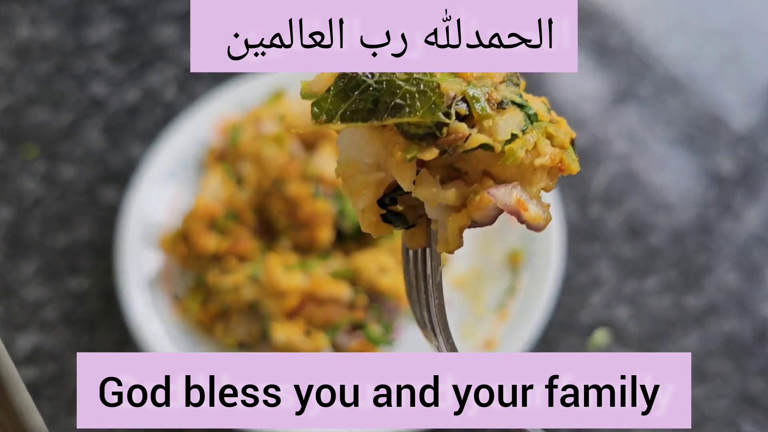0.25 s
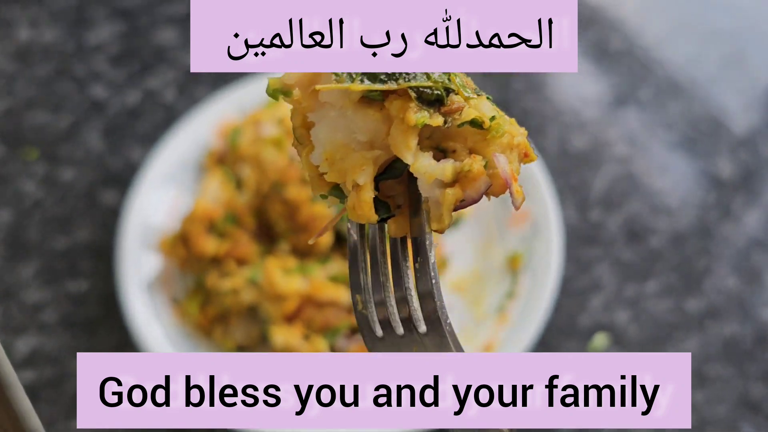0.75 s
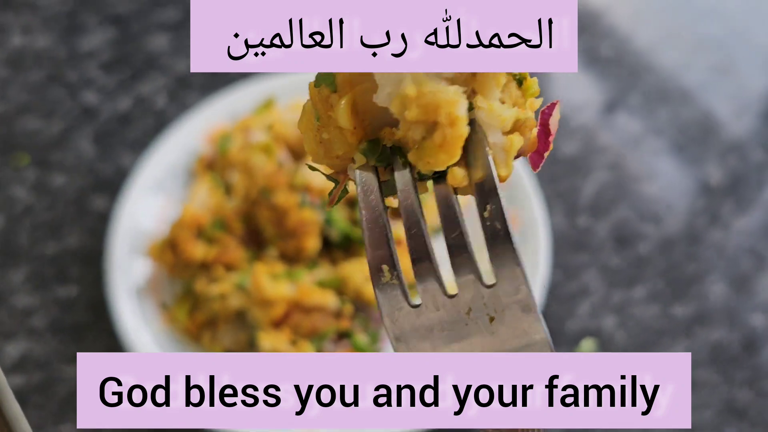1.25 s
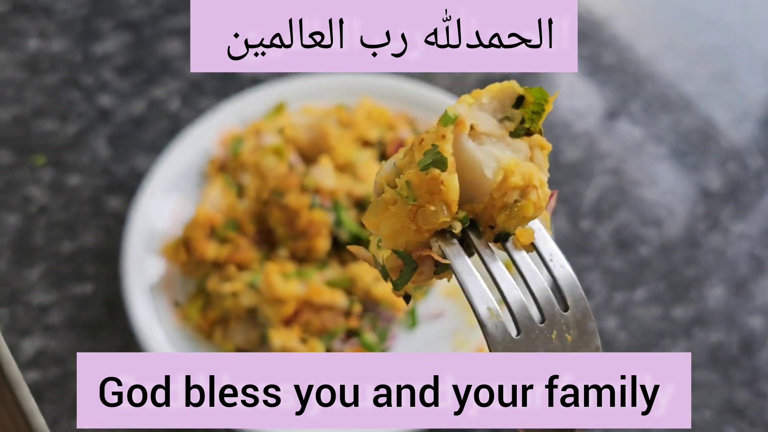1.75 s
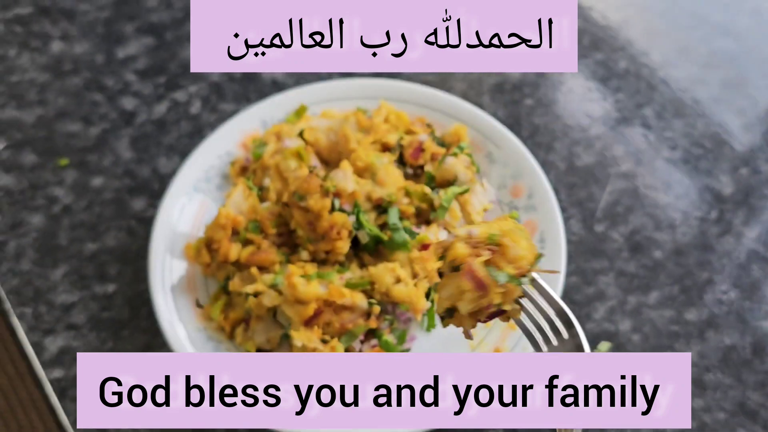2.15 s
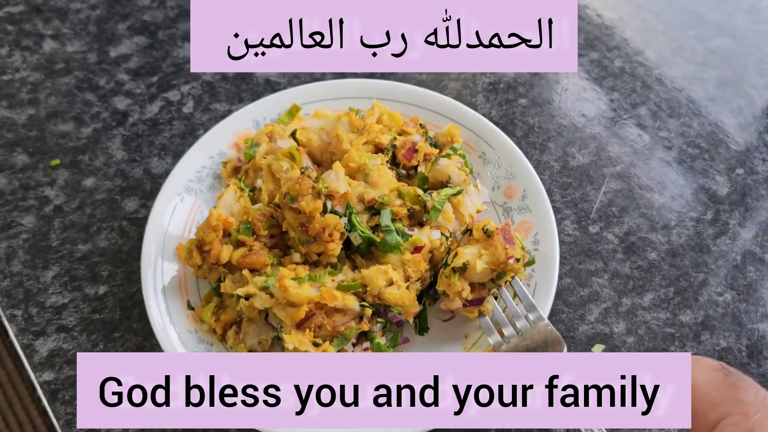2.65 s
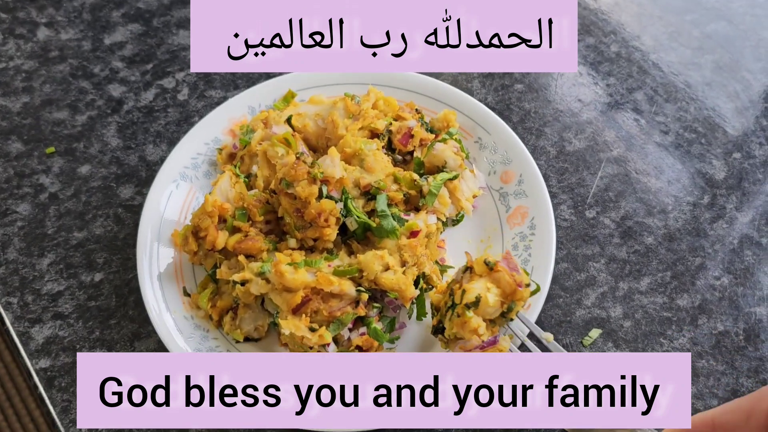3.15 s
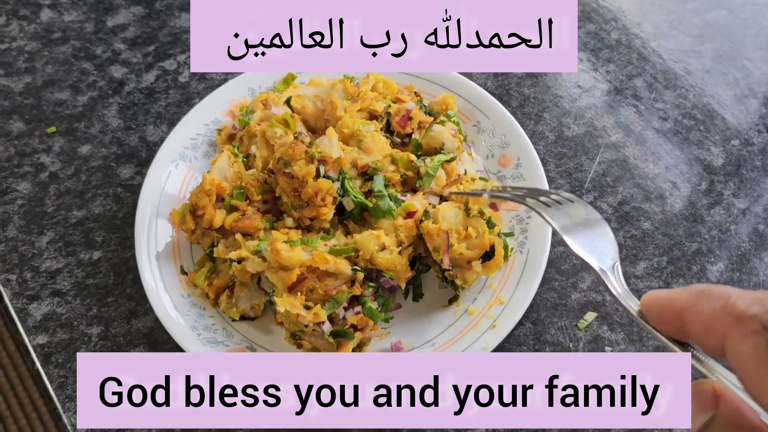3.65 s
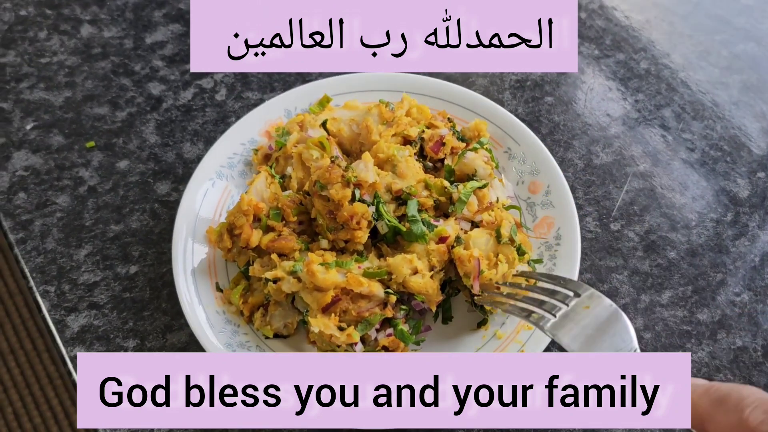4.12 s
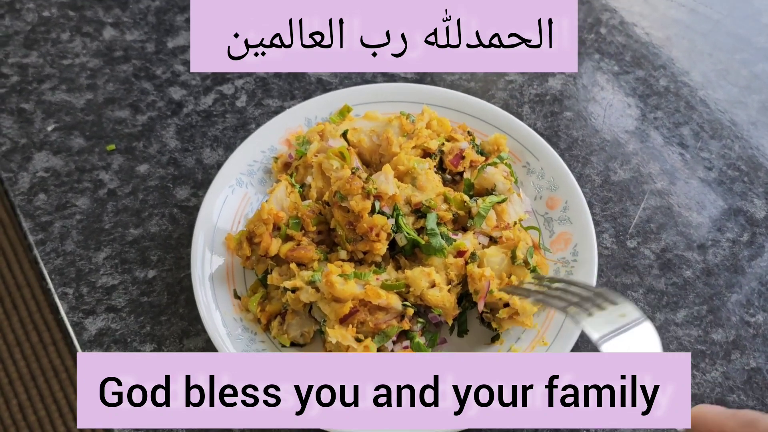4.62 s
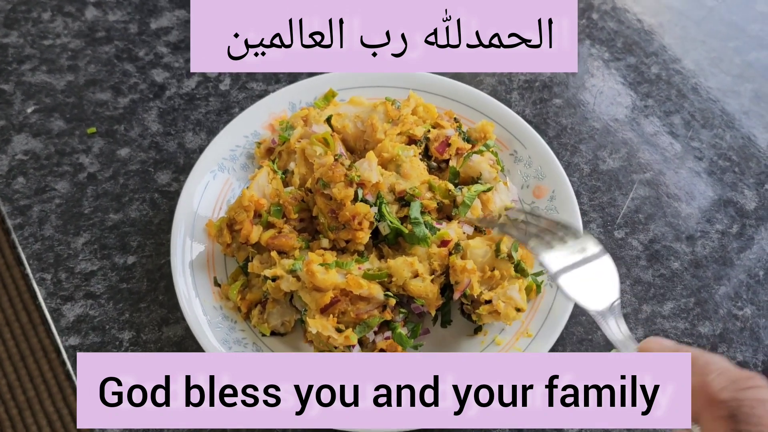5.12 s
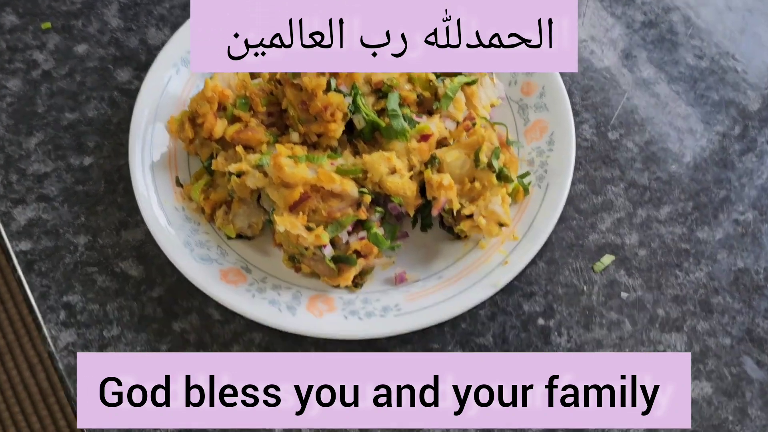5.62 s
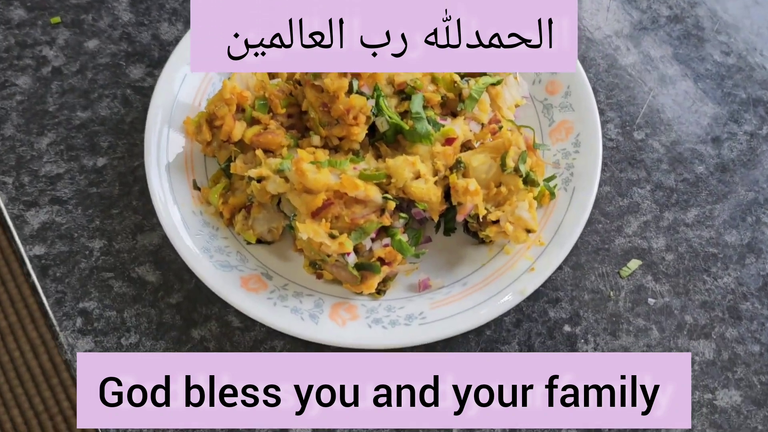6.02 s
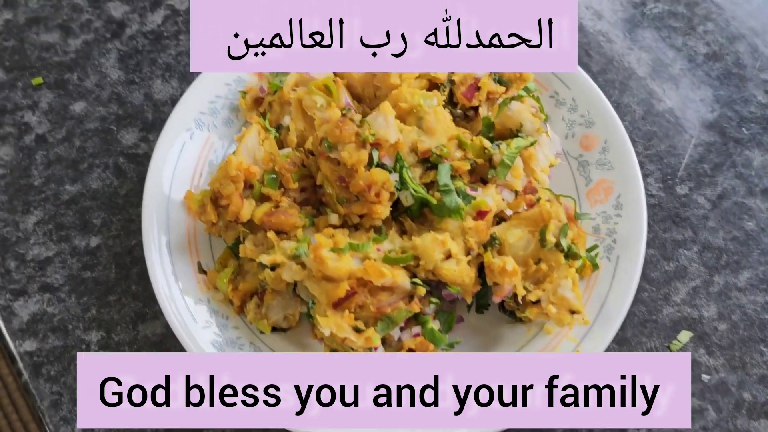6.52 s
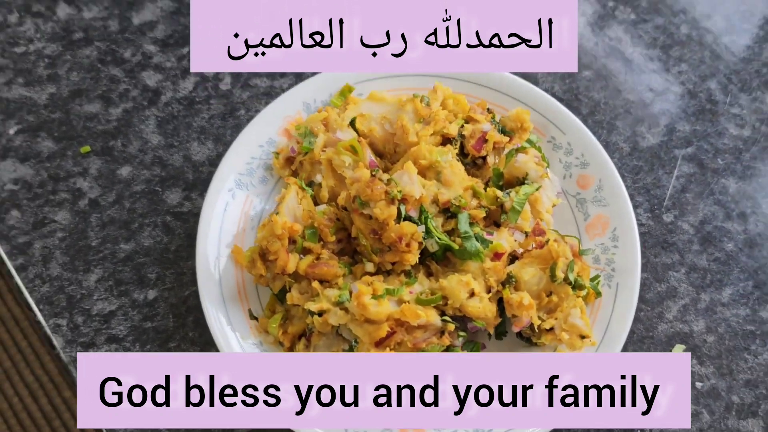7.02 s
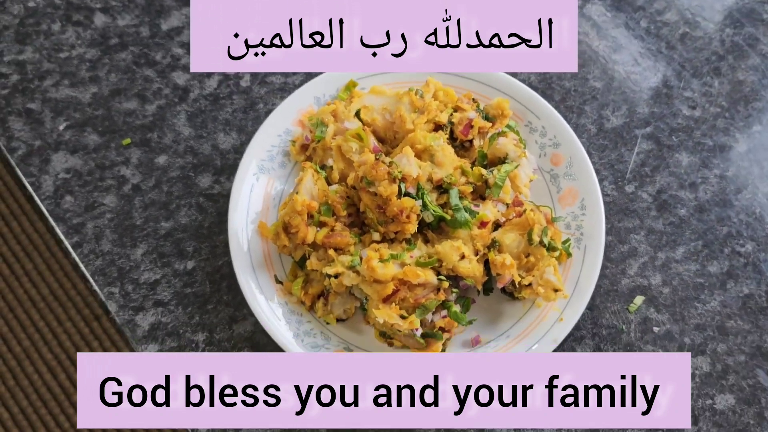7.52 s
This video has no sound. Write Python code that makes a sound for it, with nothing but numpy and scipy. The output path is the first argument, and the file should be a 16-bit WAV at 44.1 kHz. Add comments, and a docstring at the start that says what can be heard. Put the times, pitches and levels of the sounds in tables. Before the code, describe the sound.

A dull outdoor rumble with faint hiss, a very thin steady whine and a distant motor hum runs throughout, heard close by a handheld device in a small hard kitchen. From about 1.6 to 2.2 s a steel fork rubs a ceramic plate in short, food-dulled strokes, with deep handling bumps near 1.9. At 2.5 a bright clink rings with a soft food plop, and the motor begins spinning down. From 2.7 to 2.9 a drag swells quickly, singing, and stops with a small tick. Light scrapes, low bumps and soft plops continue to 4.3, then faint sticky ticks as the motor climbs back from 4.7. At 5.63 and 5.7 the plate knocks hard on stone. At 6.05 the fork lands with a brilliant metallic ring and rapid bounce. Short slides follow, the strongest scrape at 6.7; the hum grows louder around 6.8, with one last faint stroke at 7.1.

```python
"""Over a dull outdoor rumble, a thin whine and a far motor's hum, a steel fork rubs a ceramic plate in short strokes.
The hand bumps the phone, food plops, the fork clinks on the plate, the motor spins down and a swelling drag sings.
Faint sticky ticks come and the motor climbs back; the plate knocks twice on a stone counter, the fork is laid down,
bounces and rings; a short slide and a few last strokes follow. Strokes are noisy slips, knocks are damped modes and
noise bursts, hums are wavering sines; a hard little kitchen adds its echo and a hand-held phone hears it."""
import sys
import numpy as np
from scipy import signal
from scipy.fft import rfft, irfft, next_fast_len
from scipy.io import wavfile
from scipy.ndimage import uniform_filter1d, map_coordinates

SR = 44100
rng = np.random.default_rng(int(sys.argv[2]) if len(sys.argv) > 2 else 0)


def digitize_waveform(pressure):
    """Quantize a signal to 16-bit integers and store it at the path in sys.argv[1].

    Rows of a 2-D input are taken as channels; values are limited to [-1, 1].
    """
    field = np.atleast_2d(pressure).T
    bounded = np.clip(field, -1, 1)
    quanta = np.round(bounded * 32767).astype(np.int16)
    wavfile.write(sys.argv[1], SR, quanta)


N = 342745
TIME = np.arange(N) / SR
RING_TIME = np.arange(16384) / SR  # clock for strokes, thuds and echo, in s
HIT_TIME = np.arange(6000) / SR  # clock for short hits, in s

# ways the plate vibrates: f/Hz, width/Hz (wider dies faster), relative level/dB
PLATE_MODES = [(328, 25, 1), (513, 56, 7), (590, 120, -2.5), (638, 30, -5), (890, 42, -6.5), (1075, 40, -9),
               (1197, 26, -1.5), (1335.5, 39, 3), (1486, 10, -2.5), (1599, 32, -4.5), (1682, 30, -2.5),
               (1970, 16, -2.5), (2139, 58, 3.5), (2240, 51, -2.5), (2280, 150, -3), (2610, 120, -2.5),
               (2650, 39, -3.5), (2820, 35, -13), (3010, 35, -7.5), (3290, 70, -8), (3895, 80, -17),
               (4180, 90, -15.5), (4470, 50, -18.5), (5300, 120, -16), (6590, 60, -19.5)]
# ways the fork's tines vibrate: f/Hz, width/Hz, relative level/dB
TINE_MODES = [(2342, 45, -0.5), (2520, 13, -6), (3180, 60, -5.5), (3540, 60, -0.5), (4310, 70, 5),
              (4560, 26, -6), (5180, 50, -6), (5650, 45, -11.5), (7200, 70, -5), (8000, 60, -9),
              (7900, 90, -4.5), (10487, 40, 0), (11000, 60, -14), (11700, 42, -6.5), (12000, 50, -10.5),
              (12800, 55, -7.5), (13400, 70, -7.5), (14550, 70, -14.5)]


def undb(db):
    """Turn decibels into a gain."""
    return 10 ** (np.asarray(db) / 20)


def unit(x):
    """Scale a sound to rms 1."""
    return x / np.sqrt(np.mean(x ** 2))


def blow(x):
    """Scale a two-channel hit to the energy of 10 ms at rms 1."""
    return x / np.sqrt(np.sum(x ** 2) / (2 * .01 * SR))


def panned(pan_db):
    """Give left and right gains that differ by pan_db."""
    return undb(np.array([[pan_db], [-pan_db]]) / 2)


def add(track, s, sound):
    """Mix a sound into a track at time s."""
    start = max(int(s * SR), 0)
    track[:, start:start + sound.shape[1]] += sound[:, :N - start]


def along(hz, points, column=1):
    """Read a table between its rows, with frequency on a log scale."""
    points = np.array(points)
    return np.interp(np.log(hz + 1), np.log(points[:, 0]), points[:, column])


def colour(x, points):
    """Filter a sound to a given spectrum, with no sound ahead of its cause."""
    size = 2048
    log_gain = np.log(undb(along(np.fft.rfftfreq(size, 1 / SR), points)))
    # folding the cepstrum forward makes the filter minimum phase
    cepstrum = irfft(log_gain)
    cepstrum[1:size // 2] *= 2
    cepstrum[size // 2 + 1:] = 0
    response = irfft(np.exp(rfft(cepstrum)))
    return signal.fftconvolve(x, response[None], axes=1)[:, :x.shape[1]]


def band(x, lo, hi, order=2):
    """Keep only the frequencies from lo to hi, in Hz."""
    edges = [lo, min(hi, SR / 2 - 500)]
    return signal.sosfilt(signal.butter(order, edges, "band", fs=SR, output="sos"), x)


def diffuse(size, apart_hz=1200):
    """Noise at two microphones: alike in the bass, unrelated in the treble."""
    mid, side = rfft(rng.standard_normal((2, size)))
    hz = np.fft.rfftfreq(size, 1 / SR)
    side = side * np.minimum(.1 + hz / apart_hz, 1)
    return unit(irfft(np.array([mid + side, mid - side]), size))


def walk(rate):
    """Smooth random wander with rms 1; rate is its random points per second."""
    steps = rng.standard_normal(400)
    coarse = TIME[::100]
    wander = map_coordinates(steps, [coarse * rate], order=3, mode="wrap")
    return unit(np.interp(TIME, coarse, wander))


def ambience(swell_db=.9, whine_hz=932, whine_db=-81, whine_flutter_db=3):
    """Dull outdoor rumble and faint hiss swell slowly as shaped noise, with a thin wavering whine."""
    # background spectrum: f/Hz, relative level per Hz/dB
    air_spectrum = [(20, -10.5), (45, 2.5), (80, -10), (115, -5), (180, -11), (250, -9), (380, -17.5),
                    (550, -23), (950, -31.5), (2400, -42), (4200, -42.5), (6200, -50), (9500, -59.5),
                    (16000, -59.5)]
    air_db = -51.6
    size = next_fast_len(N, real=True)
    gain = undb(along(np.fft.rfftfreq(size, 1 / SR), air_spectrum))
    air = irfft(rfft(diffuse(size)) * gain, size)[:, :N]
    whine = unit(np.sin(2 * np.pi * whine_hz * TIME)) * undb(whine_db + whine_flutter_db * walk(4.4))
    return unit(air) * undb(air_db + swell_db * walk(3.5)) + whine


def hum(hz, db, waver=0.0025, flutter_db=1.3):
    """A far motor comes through the walls as one tone, wavering in pitch and level."""
    phase = 2 * np.pi * np.cumsum(hz * (1 + waver * walk(6.3))) / SR
    return np.sqrt(2) * np.sin(phase) * undb(db + flutter_db * walk(2.7))


def motor():
    """The motor sags, is switched off and spins down; later it climbs evenly, louder once under load."""
    start_hz, start_db, sag_hz_per_s = 226.5, -55, 2.2
    off_s, spin_down_hz_per_s, die_db_per_s = 2.56, 75, 14
    restart_s, restart_hz, climb_hz_per_s, restart_db = 4.7, 151, 15, -62
    load_s, load_db, fade_s = 6.82, 11, .22

    def after(s):
        """Rise from 0 to 1 after time s."""
        return np.clip((TIME - s) / fade_s, 0, 1)

    coasting = np.maximum(TIME - off_s, 0)
    slowing_hz = np.maximum(start_hz - sag_hz_per_s * TIME - spin_down_hz_per_s * coasting, 0)
    slowing = hum(slowing_hz, start_db - die_db_per_s * coasting)
    climbing_hz = restart_hz + climb_hz_per_s * (TIME - restart_s)
    climbing = hum(climbing_hz, restart_db + load_db * after(load_s))
    return slowing + climbing * after(restart_s)


def ring(modes, scatter=.9):
    """Damped modes; the higher they lie, the more their phase differs between the two microphones."""
    out = 0
    for hz, width, db in modes:
        phase = np.pi * rng.integers(2) + rng.normal(0, scatter, (2, 1)) * min(hz / 1500, 2)
        fading = np.exp(-np.pi * width * HIT_TIME)
        wave = np.sin(2 * np.pi * hz * HIT_TIME + phase)
        out = out + undb(db) * np.sqrt(width) * fading * wave
    return blow(out)


def sing(slips, modes):
    """A run of tiny slips keeps the modes ringing."""
    return signal.fftconvolve(slips, ring(modes), axes=1)[:, :slips.shape[1]]


def friction(loss_db, grit_db=5, slip_db=2.2, plate_db=-9, tine_db=-21, hiss_db=10):
    """A dense run of tiny slips of uneven size, bunched by the catching of the surfaces; food dulls it."""
    # steel rubbing glaze: f/Hz, relative level per Hz/dB, share of the treble loss felt there
    rub_spectrum = [(450, -28.5, 0), (1120, -6, 0.036), (2200, 2.5, 0), (4500, -1.5, .23), (9010, -6, 1),
                    (15500, -6.5, 1.15)]
    size = len(RING_TIME)
    catching = unit(uniform_filter1d(rng.standard_normal(size), size=150))
    slips = unit(diffuse(size) * undb(grit_db * rng.standard_normal(size) + slip_db * catching))
    dulled = [(hz, db - share * loss_db) for hz, db, share in rub_spectrum]
    rub = undb(hiss_db) * colour(slips, dulled)
    # the slips are too short to move the plate's lowest modes; the upper ones and the tines sing along
    plate = undb(plate_db) * unit(band(sing(slips, PLATE_MODES), 1600, 7000))
    tines = undb(tine_db - loss_db / 2) * unit(sing(slips, TINE_MODES))
    return rub + plate + tines


def scrapes():
    """Short strokes of the fork, each pressed in, eased off and let go; food slows the bite."""
    # strokes over the plate: t/s, length/s, relative level/dB, treble lost to food under the tines/dB
    strokes = [(1.575, .047, -45, 24), (1.637, .06, -60, 25), (1.794, 0.048, -59, 36),
               (1.85, .11, -66.5, 33), (2.07, .018, -63, 18), (2.116, .04, -56, 23), (2.155, .045, -54, 16),
               (2.223, 0.041, -46.5, 20), (2.978, 0.081, -69.5, -2), (3.152, .048, -58.5, 5),
               (3.445, .045, -57.5, 3), (3.53, .04, -49.5, 15), (3.833, .036, -65, -2),
               (3.874, .036, -51, 12), (4.03, .25, -67, 7), (4.52, .03, -65, 16), (5.018, 0.097, -67, 0),
               (5.455, .03, -62.5, 9), (6.27, .13, -63.5, 12), (6.405, .03, -65, 3),
               (6.457, .025, -57, 4.5), (6.548, .12, -51, 11), (6.675, .05, -33, 11), (7.10, .09, -74, -2)]
    bite_s, cushion_s_per_db, ease_db, release_s = .003, .0005, 3.5, .022
    out = np.zeros((2, N))
    for s, length, db, loss_db in strokes:
        rise_s = bite_s + cushion_s_per_db * max(loss_db, 0)
        letting_go = np.exp(-np.maximum(RING_TIME - length, 0) / release_s)
        pressure = np.minimum(RING_TIME / rise_s, 1) * letting_go
        easing_db = ease_db * (.5 - np.minimum(RING_TIME / length, 1))
        add(out, s, undb(db + easing_db) * pressure * friction(loss_db))
    return out


def handling():
    """The grip shifts and rocks the phone for a few slow cycles: short swells of a low sine."""
    # bumps of the hand on the phone: t/s, level/dB, f/Hz
    bumps = [(1.84, -17, 35.8), (1.891, -21.5, 28.8), (2.125, -32.5, 45), (3.33, -39, 55),
             (3.635, -29.5, 42), (3.968, -26.5, 42), (4.016, -36, 50), (4.507, -39.5, 50)]
    fade_cycles = 0.99  # from the peak of a bump down to about a third
    out = 0
    for s, db, hz in bumps:
        swell = np.exp(-((TIME - s) * hz / fade_cycles) ** 2)
        out = out + undb(db) * swell * np.sin(2 * np.pi * hz * (TIME - s))
    return out


def thud(hz, t60, spread=1.35):
    """A soft, heavy contact stirs only low, well damped modes, heard as a narrow band of fading noise."""
    shake = diffuse(len(RING_TIME)) * undb(-60 * RING_TIME / t60)
    return blow(band(shake, hz / spread, hz * spread))


def plops():
    """Food drops and settles on the plate with soft thuds."""
    # plops of food: t/s, level/dB, f/Hz
    drops = [(2.132, -42, 285), (2.497, -36, 300), (2.97, -41.5, 251), (3.538, -39, 295), (3.96, -47, 268),
             (4.12, -48, 330), (4.29, -53, 358)]
    out = np.zeros((2, N))
    for s, db, hz in drops:
        add(out, s, undb(db) * thud(hz, t60=.28))
    return out


def burst(spectrum, t60):
    """Crowded, quickly damped modes merge into a short burst of noise."""
    return blow(colour(diffuse(len(HIT_TIME)) * undb(-60 * HIT_TIME / t60), spectrum))


def off_counter(x, lag_s=.000905, share=0.14):
    """Sound from the fork also bounces off the stone just below it, which combs its spectrum."""
    bounced = np.roll(x, round(lag_s * SR), axis=1)
    return (x + share * bounced) / np.hypot(1, share)


def skid(sound, rise_s):
    """Skidding before it seats spreads the same energy over a longer attack."""
    seated = sound * np.minimum(HIT_TIME / rise_s, 1)
    return seated * np.std(sound) / np.std(seated)


def clinks():
    """Every contact cracks, knocks the plate and rings the fork, in shares set by where it lands."""
    # hard contacts: t/s, plate knock level/dB, bright crack level/dB, tine ring level/dB,
    # handle ring level/dB, left minus right/dB
    contacts = [(2.495, -32.5, -20.5, -20, -66, -1.5), (2.968, -52, -42.5, -54, -50.5, -4),
                (5.6302, -15, -30.5, -40, -36, 0), (5.700, -10, -30, -42.5, -40, 2),
                (6.052, -18, -21, -46, -15.5, -1), (6.0716, -23, -23.5, -47, -30.5, -6),
                (6.0773, -25.5, -30, -48.5, -39.5, 2)]
    # ways the handle vibrates: f/Hz, width/Hz, relative level/dB
    handle_modes = [(3036, 24, -15.5), (4180, 68, -27), (5800, 40, -15.5), (7785, 28, -10),
                    (9900, 33, -9.5), (11410, 35, -21), (12620, 30, -4), (14370, 41, 0)]
    # spectrum of the plate's knock: f/Hz, relative level per Hz/dB
    knock_spectrum = [(25, -36.5), (65, -17.5), (130, -4.5), (300, -6), (410, -14), (600, 0), (900, -6),
                      (1500, -4), (2150, 3.5), (2550, -1.5), (3200, -6.5), (4700, -16), (6000, -16),
                      (10000, -33.5), (16000, -35)]
    # spectrum of the bright crack: f/Hz, relative level per Hz/dB
    crack_spectrum = [(25, -24.5), (100, -6.5), (300, 3), (700, -12), (1300, -5), (3000, -2.5), (5000, 0.5),
                      (8000, -0.5), (10500, -3.5), (13000, -4), (16000, -10.5)]
    # the handle thuds the counter, which shakes the plate: f/Hz, t60/s, level against the handle's ring/dB
    counter_thuds = [(125, .1, -7), (280, .1, -15), (520, .12, -12)]
    # the plate seats quickly, the steel skids a little longer
    plate_rise_s, steel_rise_s = .0011, 0.0022
    out = np.zeros((2, N))
    for s, knock_db, crack_db, tine_db, handle_db, pan_db in contacts:
        plate = undb(-7.5) * ring(PLATE_MODES) + undb(-0.5) * burst(knock_spectrum, t60=.048)
        crack = undb(crack_db) * burst(crack_spectrum, t60=0.077)
        tip = off_counter(undb(tine_db) * ring(TINE_MODES) + crack)
        # the handle lies nearer the left microphone
        steel = tip + undb(handle_db) * ring(handle_modes) * panned(pan_db=7)
        hit = undb(knock_db) * skid(plate, plate_rise_s) + skid(steel, steel_rise_s)
        add(out, s, hit * panned(pan_db))
        for hz, t60, db in counter_thuds:
            add(out, s, undb(handle_db + db) * thud(hz, t60))
    return out


def drag(lift_s=0.0043):
    """The tines are drawn out of the bite, pressing ever harder and singing until they lift off."""
    # what the dragged tines sing with: f/Hz, width/Hz, relative level/dB
    tone_modes = [(2560, 35, 0), (4600, 70, -2)]
    start_s, end_s, swell_db_per_s = 2.68, 2.878, 69
    rub_db, tone_db, loss_db = -55.5, -62.5, 6  # loss_db: treble lost to food
    out = np.zeros((2, N))
    past_end = RING_TIME - (end_s - start_s)
    swell = undb(swell_db_per_s * np.minimum(past_end, 0))
    pressure = swell * np.exp(-np.maximum(past_end, 0) / lift_s)
    tones = undb(tone_db) * unit(sing(diffuse(len(RING_TIME)), tone_modes))
    add(out, start_s, undb(rub_db) * pressure * friction(loss_db) + np.sqrt(pressure) * tones)
    return out


def dabs(start_s=4.0, end_s=5.6, db=-75, spread_db=3, length_s=.02, crackle_db=6, count=9):
    """Faint sticky crackles of food come at loose intervals, as brief swells of rough bright noise."""
    out = np.zeros((2, N))
    touch = HIT_TIME / length_s * np.exp(1 - HIT_TIME / length_s)
    for k, (when, size) in enumerate(rng.random((count, 2))):
        crackle = diffuse(len(HIT_TIME)) * undb(crackle_db * rng.standard_normal(len(HIT_TIME)))
        s = start_s + (end_s - start_s) * (k + when) / count
        level_db = db + spread_db * 2 * size
        add(out, s, undb(level_db) * touch * unit(band(crackle, 3000, 18000)))
    return out


def shade(x):
    """A near sound leans left or right by frequency, as the body of the phone shades its microphones."""
    # shading by the phone: f/Hz, left minus right/dB
    lean = [(400, 1.5), (1000, -.5), (2300, -2.5), (4500, .5), (12000, 1.5)]
    left = colour(x[[0]], [(hz, db / 2) for hz, db in lean])
    right = colour(x[[1]], [(hz, -db / 2) for hz, db in lean])
    return np.vstack([left, right])


def kitchen(x, first_wall_s=0.0028):
    """Tiles and stone return a dense tail of noise, each octave fading at its own pace, the top soonest."""
    # the kitchen's echo: f/Hz, t60/s, level/dB
    echo = [(150, 0.27, -15), (540, 0.25, -2.5), (2200, 0.3, -8.5), (5000, 0.3, -8.5), (9000, 0.23, -12),
            (15000, .2, -17.5)]
    size = len(RING_TIME)
    hz = np.fft.rfftfreq(size, 1 / SR)
    noise = rfft(diffuse(size))
    octave = np.log2(np.maximum(hz, 125) / 125)
    response = 0
    for k in range(8):
        centre = 125 * 2 ** k
        t60 = along(centre, echo)
        level = undb(along(centre, echo, column=2))
        # silent until the first wall answers
        decay = undb(-60 * RING_TIME / t60) * np.clip(RING_TIME / first_wall_s - 1, 0, 1)
        part = irfft(noise * np.maximum(1 - abs(octave - k), 0), size)
        response = response + part * decay / np.sqrt(np.sum(decay ** 2)) * level
    return signal.fftconvolve(x, response, axes=1)[:, :N]


def scene(rub_db=-3.5, rub_room_db=2):
    """Fork and plate over the background; food screens the rubs, so more of them comes via the walls."""
    background = ambience() + motor() + handling()
    rubs = undb(rub_db) * off_counter(scrapes() + drag() + dabs())
    hits = plops() + shade(clinks())
    room = kitchen(hits + undb(rub_room_db) * rubs)
    return hits + rubs + room + background * panned(pan_db=.9)


def record(dry):
    """The phone clips at full scale and cuts the top of the treble."""
    top_hz = 15900
    low_pass = signal.ellip(8, .2, 70, top_hz, fs=SR, output="sos")
    return signal.sosfilt(low_pass, np.clip(dry, -1, 1))


dry = scene()
out = record(dry)
digitize_waveform(out)
```